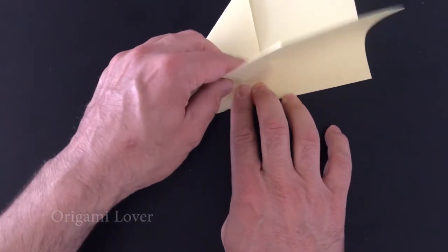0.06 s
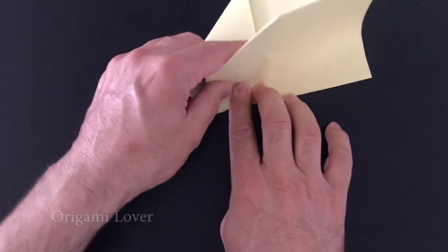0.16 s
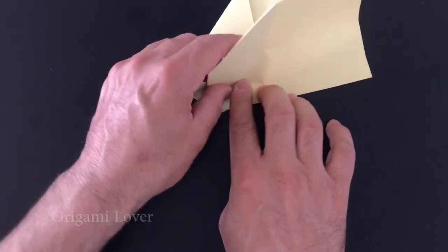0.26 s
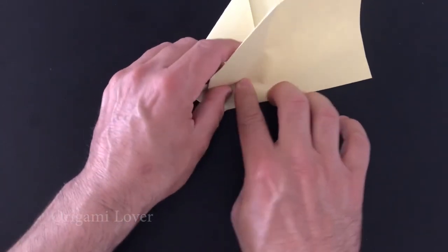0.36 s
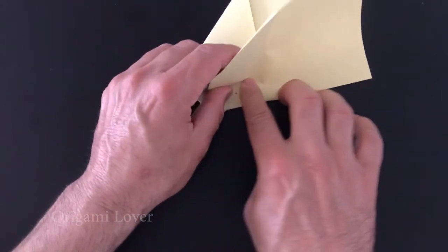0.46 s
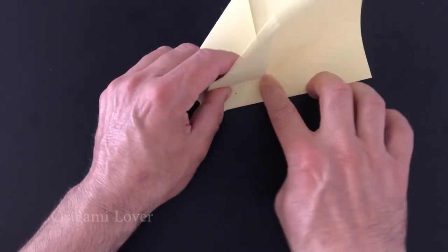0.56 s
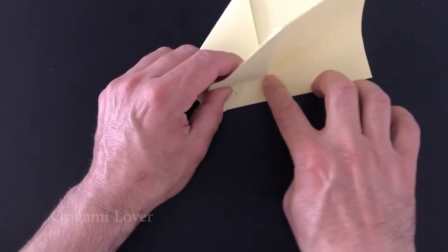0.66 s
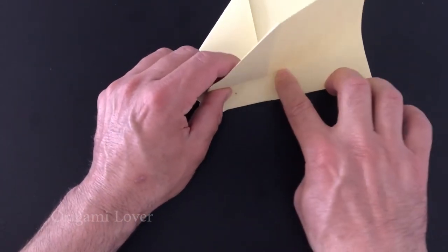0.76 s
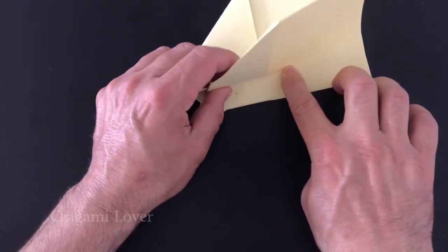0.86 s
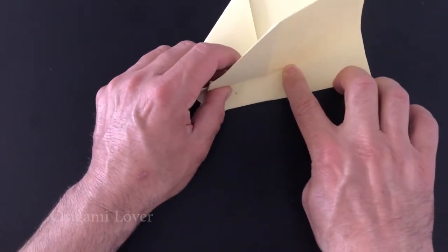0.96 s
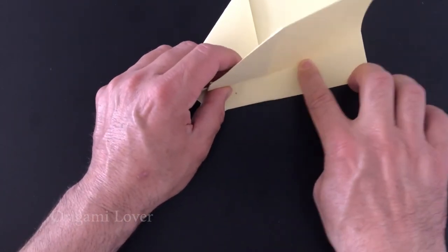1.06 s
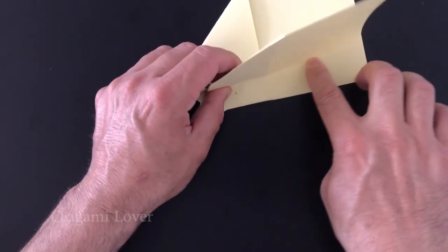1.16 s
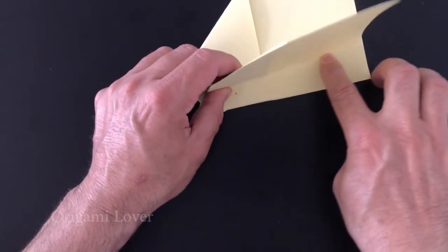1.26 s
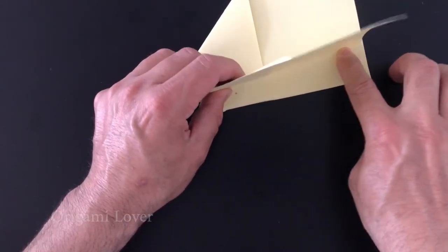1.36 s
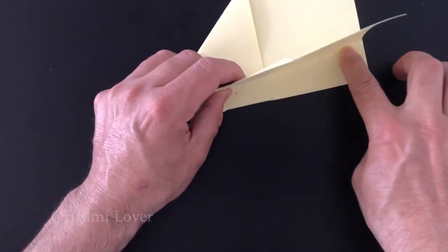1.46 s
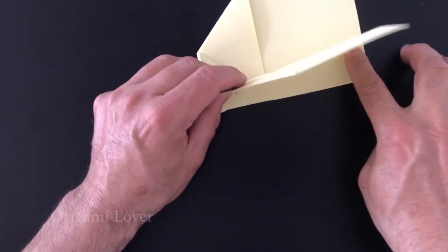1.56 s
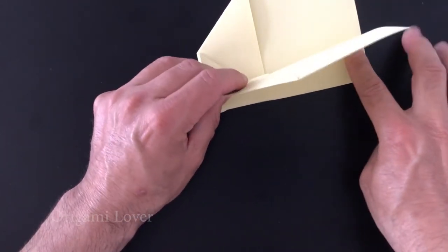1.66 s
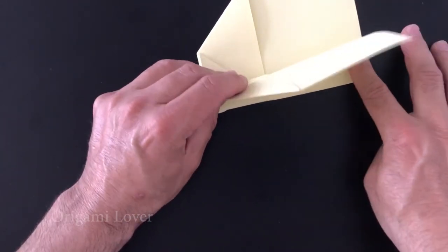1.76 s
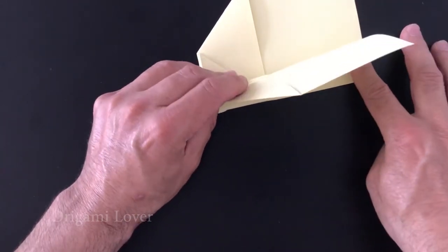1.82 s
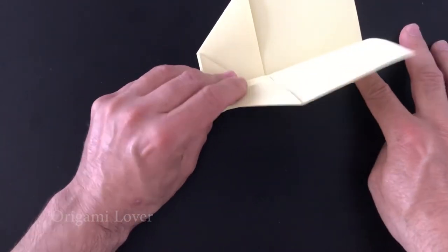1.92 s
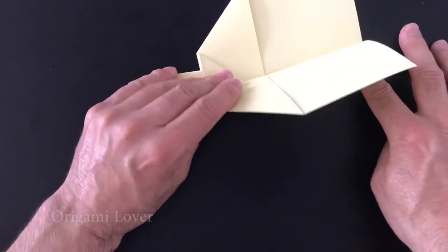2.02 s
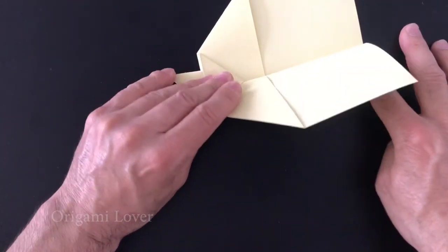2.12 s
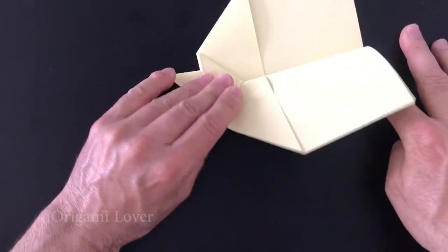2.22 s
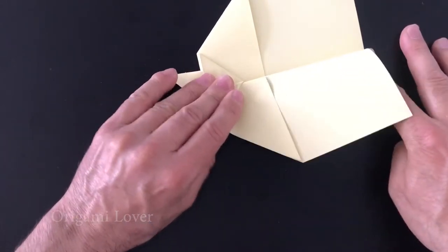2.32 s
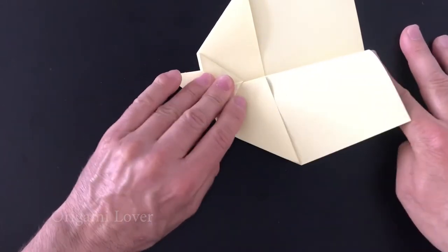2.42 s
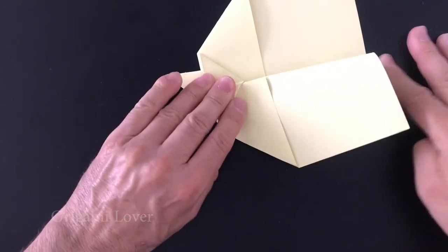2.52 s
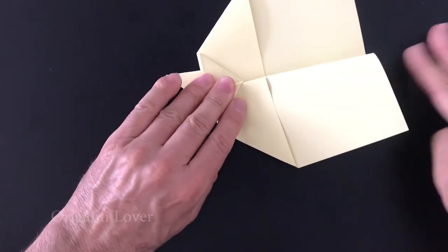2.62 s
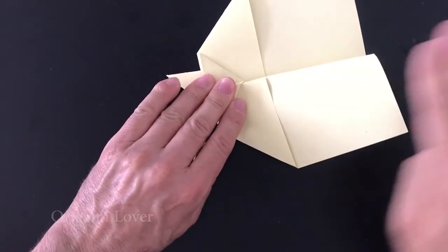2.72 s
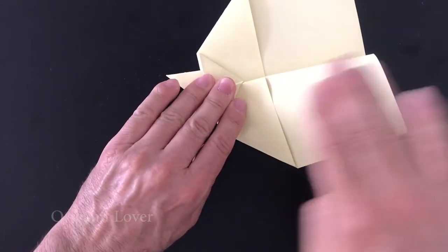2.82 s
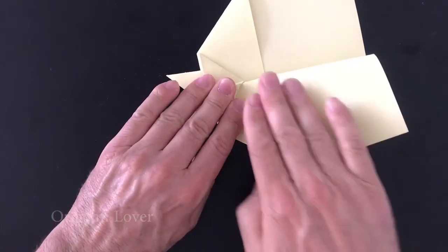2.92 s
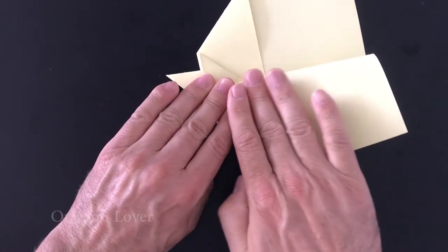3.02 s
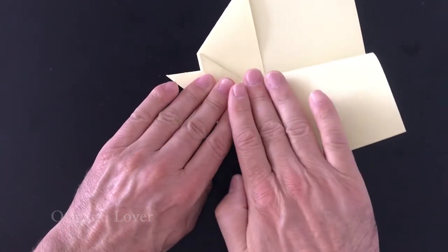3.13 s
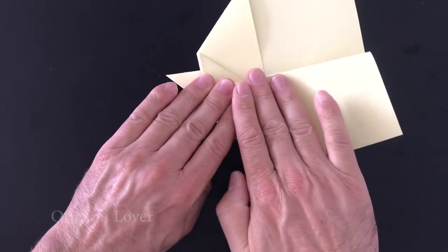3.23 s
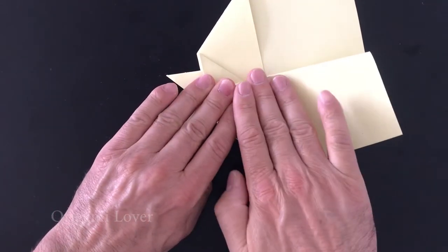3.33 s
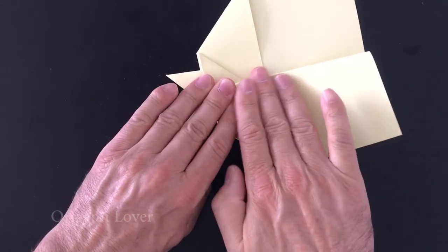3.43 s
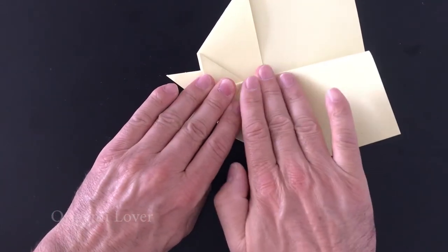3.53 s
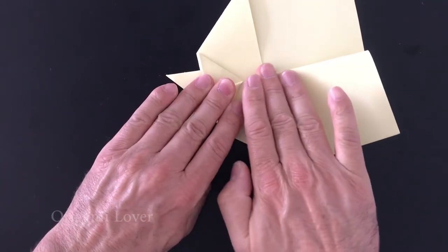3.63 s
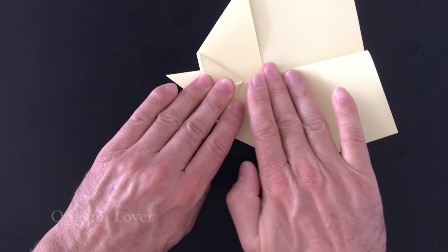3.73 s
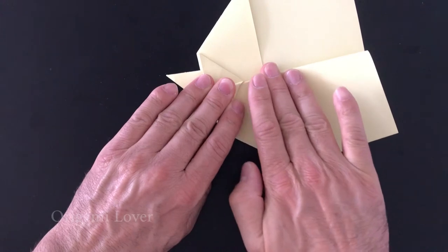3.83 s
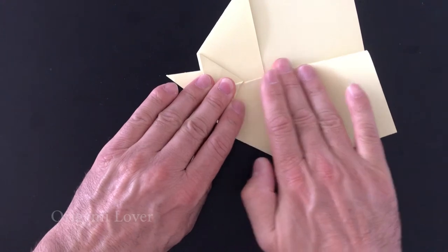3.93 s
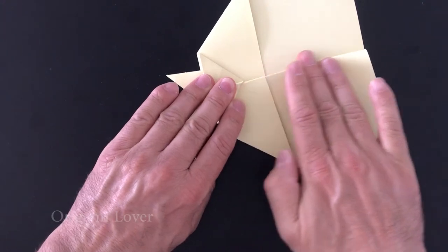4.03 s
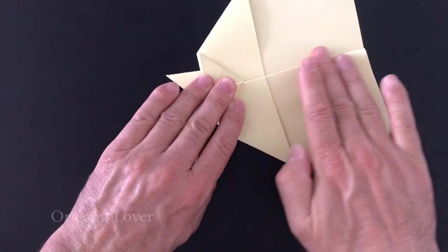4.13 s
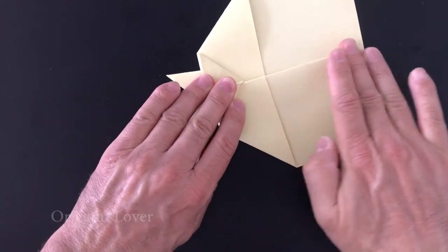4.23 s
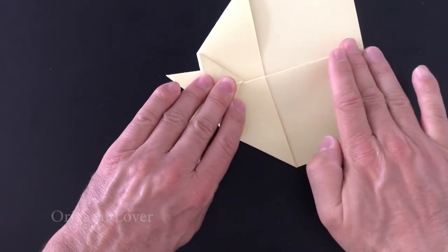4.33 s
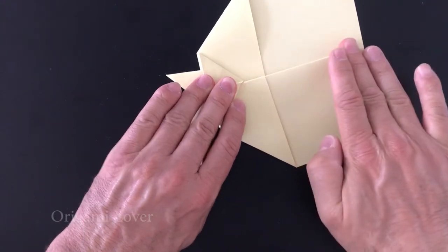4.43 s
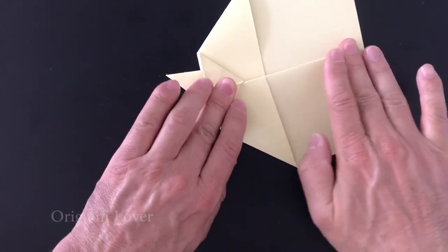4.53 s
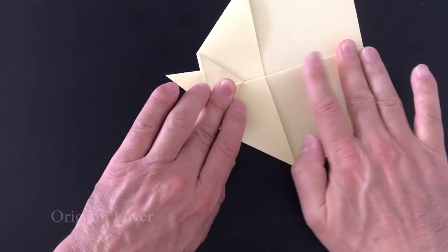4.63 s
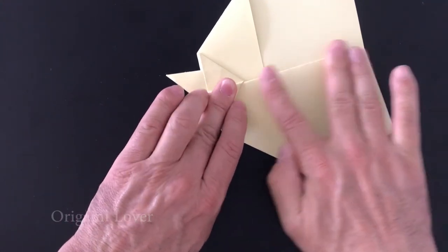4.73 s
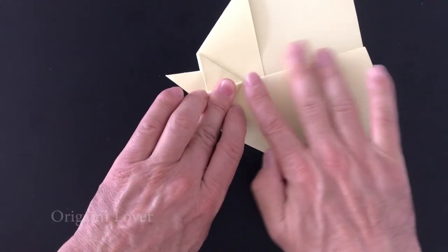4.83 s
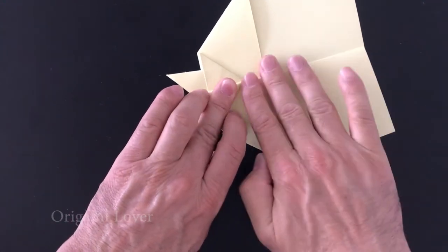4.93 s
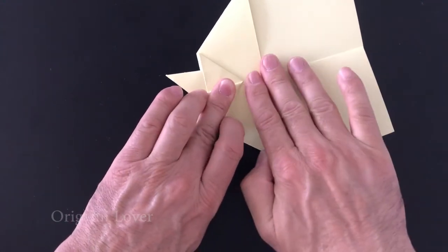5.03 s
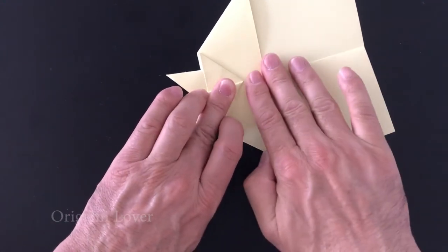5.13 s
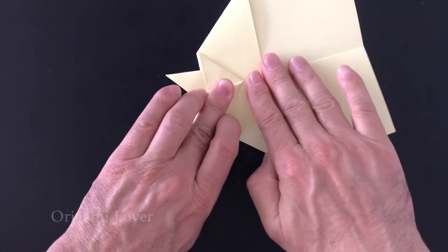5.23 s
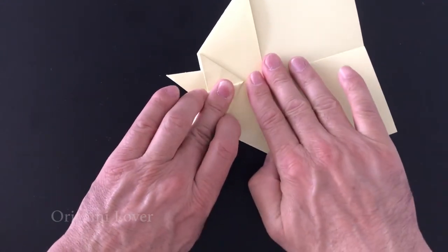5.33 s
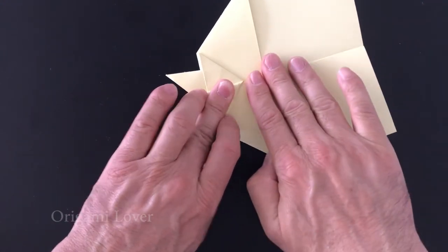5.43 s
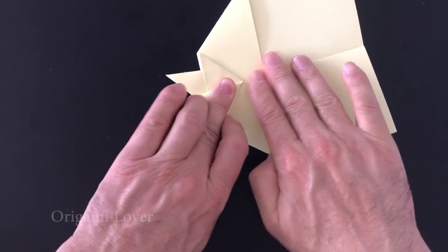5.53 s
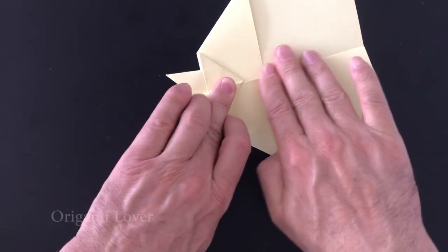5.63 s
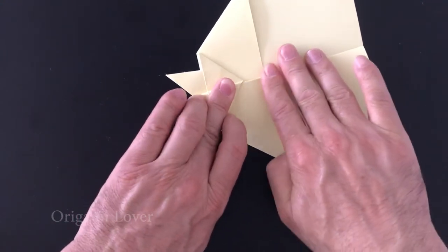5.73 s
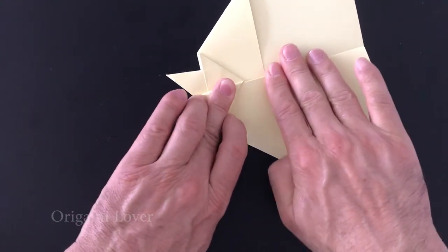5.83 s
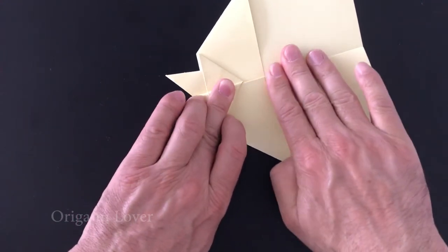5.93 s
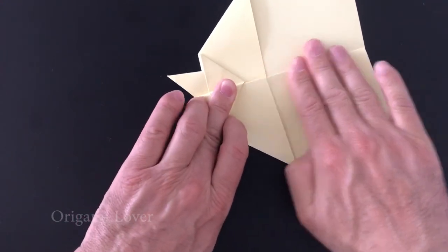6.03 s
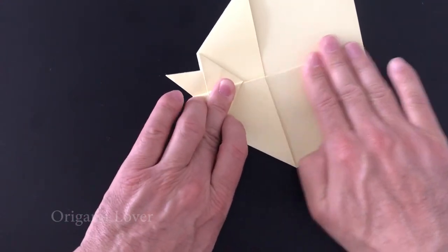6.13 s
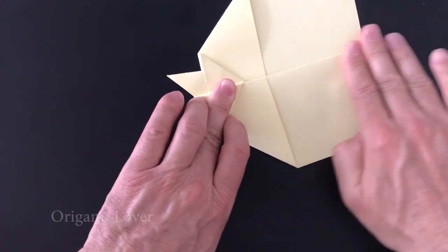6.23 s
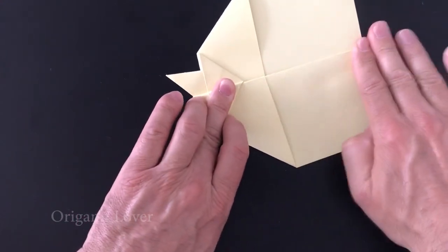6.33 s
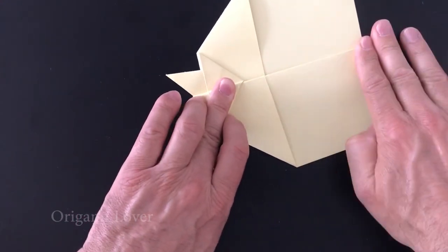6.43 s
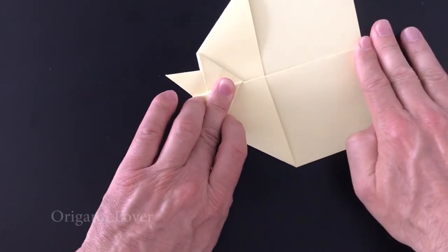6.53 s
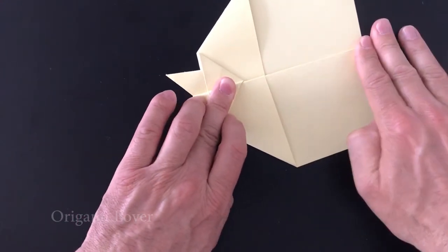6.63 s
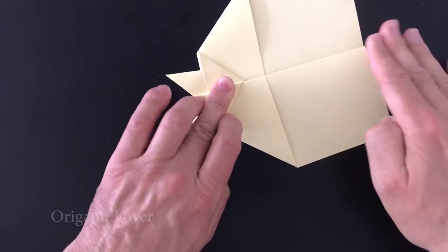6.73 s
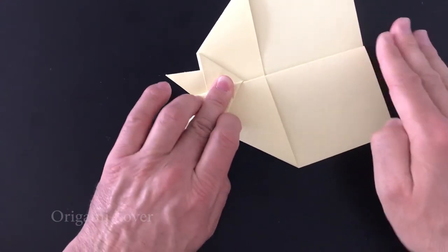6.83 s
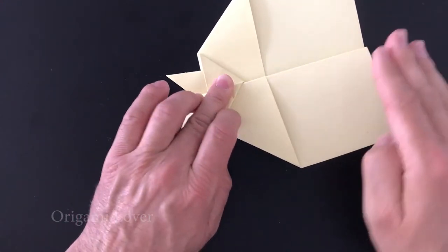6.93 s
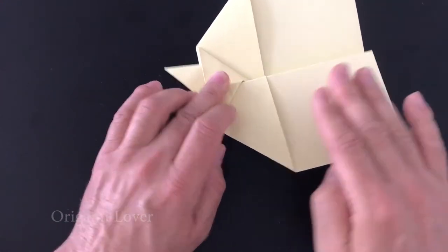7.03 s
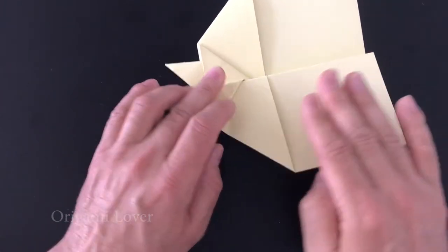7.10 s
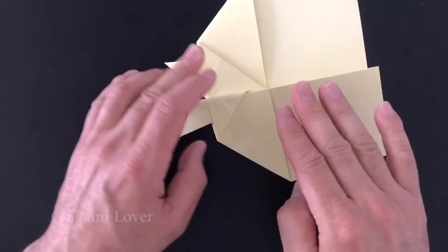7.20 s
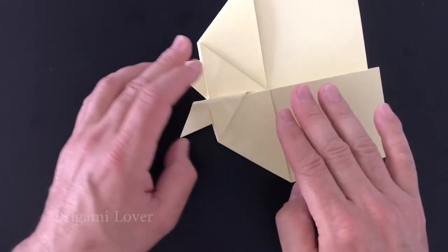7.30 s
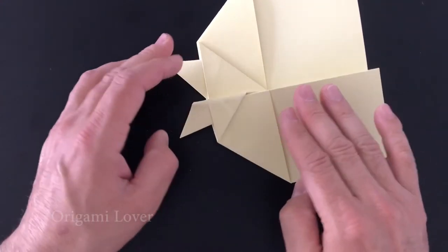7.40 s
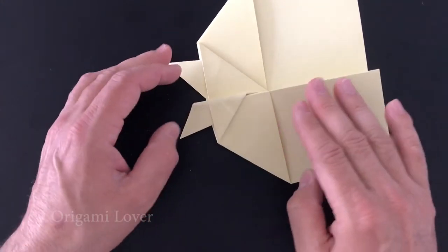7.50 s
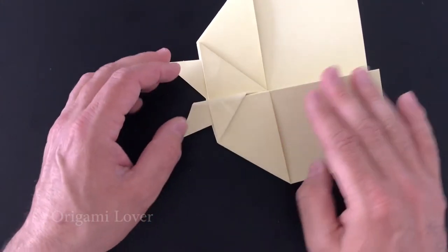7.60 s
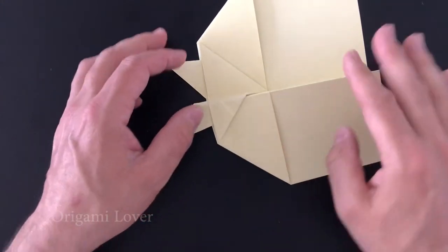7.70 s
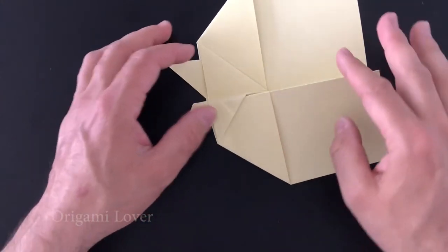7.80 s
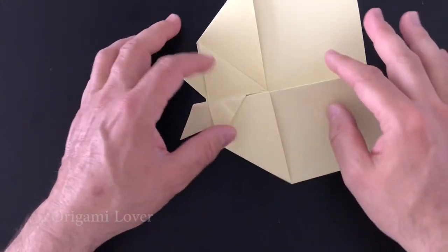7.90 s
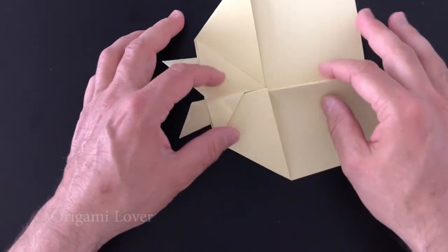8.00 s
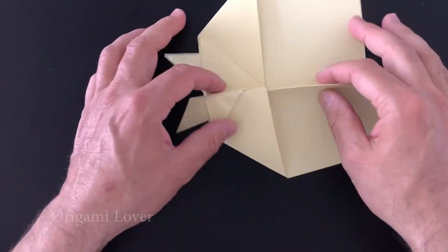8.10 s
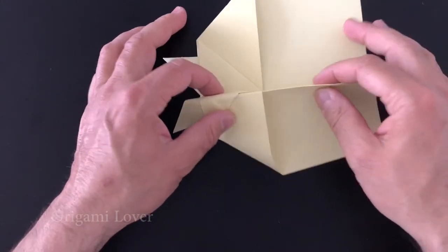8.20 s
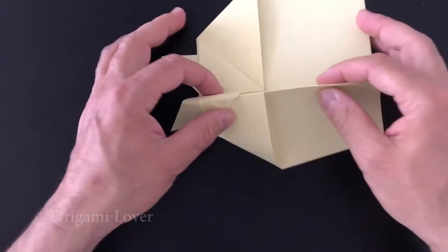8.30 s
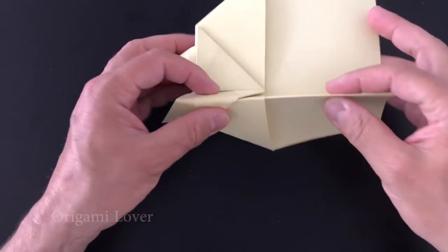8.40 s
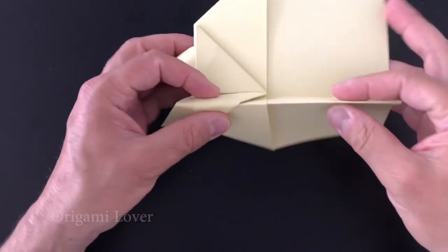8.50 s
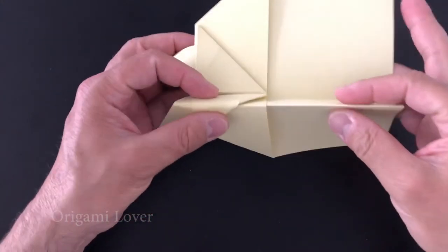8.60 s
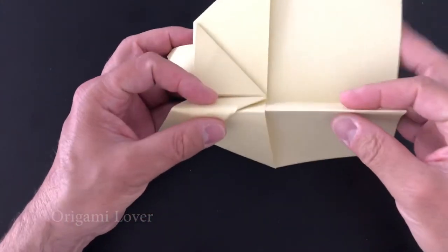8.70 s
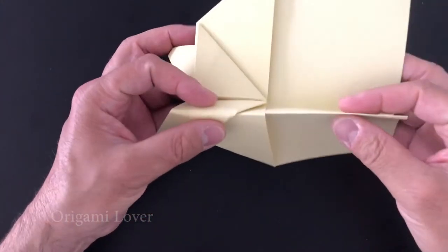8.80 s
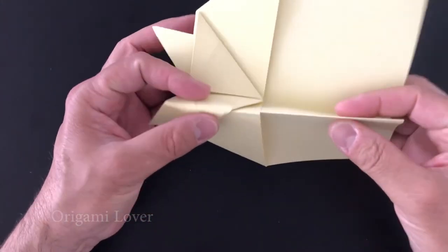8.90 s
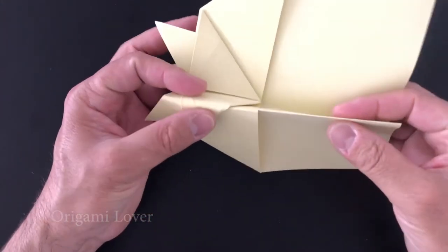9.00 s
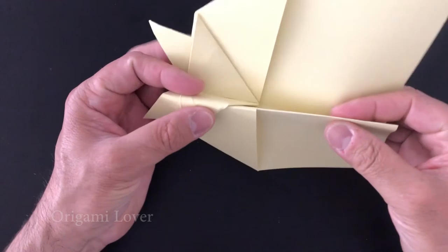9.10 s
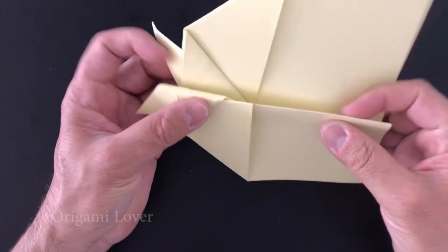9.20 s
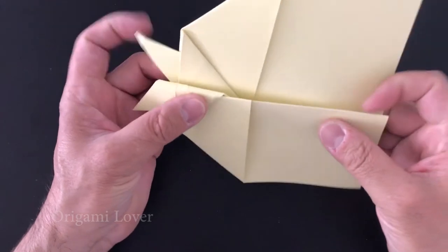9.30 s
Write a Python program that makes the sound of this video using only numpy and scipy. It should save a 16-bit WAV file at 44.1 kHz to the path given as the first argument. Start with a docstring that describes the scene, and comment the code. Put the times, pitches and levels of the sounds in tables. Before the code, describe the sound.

A stiff sheet of paper is folded on a table in a small, quiet room, heard close up. Rustling and short fingertip scrapes come first, with a few dull taps and sharp snaps. Flat hands then press and smooth the crease with broader rubs and soft thuds. After a calmer stretch the sheet swishes over the table and ends in bright crackles as it is lifted and bent.

```python
"""A small, quiet room: a sheet of paper is folded by hand on a table, over still air and a faint hum.
Fingertips hiss and scrape along the crease: many tiny fibre catches over smooth noise, shaped stroke by stroke.
A flat hand taps and smooths the sheet, which rustles as it bends and swishes as it is dragged.
The stiff paper buckles with sharp snaps: runs of pulses that ring in five registers, answered by the room."""
import sys
import numpy as np
from scipy import signal
from scipy.fft import rfft, irfft, next_fast_len
from scipy.io import wavfile

SR = 44100
rng = np.random.default_rng(int(sys.argv[2]) if len(sys.argv) > 2 else 0)


def unload_wav(signal):
    """Save mono or channel-first audio to the path in sys.argv[1] as 16-bit WAV at rate SR, clipped to [-1, 1]."""
    wavfile.write(
        sys.argv[1],
        SR,
        np.round(np.clip(np.atleast_2d(signal).T, -1, 1) * 32767).astype(np.int16),
    )


N = 412335
TIME = np.arange(N) / SR

# Levels in the tables and settings stand ahead of the trims that the functions apply.
# registers in which the sheet rings, in order thump, flap, crack, tick, fizz:
# [low f/Hz, high f/Hz, t60/s, shiver against the slip/dB, lingering share of the shiver/dB]
REGISTERS = [(134, 444, 0.065, -26.5, -8), (464, 1330, 0.022, -18.5, -11.5),
             (1410, 3470, 0.006, -17, -13.5), (3710, 7000, 0.0077, -23, -13.5),
             (7500, 15400, 0.0038, -3, -23.5)]
# broad resonances of the sheet on the table: [f/Hz, width/Hz, level/dB]
SHEET_RESONANCES = [(302, 54, 8.5), (740, 175, -4), (1018, 310, 8.5), (1380, 100, -5), (2320, 1860, 3)]
# fingertips slide and push paper over paper:
# [start t/s, length/s, skin level/dB, scrape level/dB, swell over the stroke/dB, skin above 10 kHz/dB]
STROKES = [(0.01, 0.095, -52, -48.5, -12, -4), (0.112, 0.056, -65, -62, -2, -5),
           (0.162, 0.086, -62.5, -59, -9, 0), (0.259, 0.21, -56.5, -62, -7, -5.5),
           (0.445, 0.18, -51.5, -57, 11, -1.5), (0.667, 0.19, -54.5, -62, -3.5, 3),
           (0.928, 0.024, -59.5, -65, 0, 3), (1.01, 0.16, -55, -64, -2, -0.5),
           (1.163, .25, -58.5, -67.5, -2.5, 4.5), (1.417, .11, -71, -74, -1, 3),
           (1.56, 0.12, -63.5, -67, -1, 6), (1.703, 0.099, -77, -72, 5, 0),
           (1.93, 0.44, -65.5, -65, -1, -3), (2.406, 0.16, -64.5, -57.5, 14.5, 2),
           (2.585, 0.085, -61, -78, 8, -3), (2.982, 0.05, -62, -60.5, -7, 0),
           (3.093, 0.023, -64.5, -69, 0, -2), (3.203, 0.22, -75.5, -64.5, -10, -5),
           (3.455, 0.036, -53.5, -53.5, 0, 1), (3.61, 0.041, -60, -55.5, -3, -1),
           (3.759, 0.027, -63, -55, 1, 1), (3.895, 0.11, -54.5, -54.5, -10, 0),
           (4.0, .3, -52, -60.5, -4.5, -2.5), (4.755, 0.096, -60, -68.5, 6, 2),
           (4.874, 0.044, -58.5, -62, 4, 3.5), (5.514, 0.068, -68.5, -73, -3, 1),
           (5.599, 0.082, -56.5, -58.5, -5, 0.5), (5.726, 0.018, -63, -71, 5, -5),
           (6.005, 0.31, -56.5, -63.5, -0.5, 3.5), (6.283, .11, -64, -68, 0, 1),
           (6.685, .14, -73, -84, 3, -3), (6.88, .15, -77, -77, 2, 0), (7.027, 0.1, -60, -65.5, 11.5, -2.5),
           (7.964, 0.088, -57, -64, 1, -1), (8.064, 0.18, -54, -78, -8, -0.5),
           (8.252, 0.26, -59, -62.5, -2.5, 1.5), (8.528, 0.23, -63.5, -71, -7, 2),
           (8.84, 0.13, -56, -63, 3, 0.5), (9.043, 0.36, -57.5, -59.5, -2, -0.5)]

# linear attack time and exponential release time constant of the movements
STROKE_ATTACK_S, STROKE_RELEASE_S = 0.014, 0.014
BEND_ATTACK_S, BEND_RELEASE_S = 0.015, 0.025
DRAG_ATTACK_S, DRAG_RELEASE_S = 0.014, 0.0089
# a hand moves fastest halfway: how far the ends fall below the middle, per second of stroke
ARCH_DB_PER_S = 7


def from_db(db):
    """Decibels to gain."""
    return 10 ** (np.asarray(db) / 20)


def rms_one(x):
    """Scale to rms 1."""
    return x / np.sqrt(np.mean(x ** 2) + 1e-20)


def level(rows):
    """A level curve as a gain per sample, inaudible outside its span."""
    rows = np.array(rows)
    return from_db(np.interp(TIME, rows[:, 0], rows[:, 1], left=-140, right=-140))


def at_hz(points, hz):
    """Read a spectrum on a log-frequency axis."""
    points = np.array(points)
    return np.interp(np.log(np.maximum(hz, 1)), np.log(points[:, 0]), points[:, 1])


def band(x, low, high, order=2):
    """Causal band-pass."""
    edges = [low, min(high, SR / 2 - 1000)]
    return signal.sosfilt(signal.butter(order, edges, "band", fs=SR, output="sos"), x)


def resonance(x, hz, width_hz):
    """One resonance with gain 1 on top."""
    r = np.exp(-np.pi * width_hz / SR)
    zeros = np.array([1, 0, -1]) * (1 - r * r) / 2
    poles = [1, -2 * r * np.cos(2 * np.pi * hz / SR), r * r]
    return signal.lfilter(zeros, poles, x)


def coloured(x, colour):
    """Give a steady sound a spectrum; rms 1."""
    size = next_fast_len(N)
    gain = from_db(at_hz(colour, np.fft.rfftfreq(size, 1 / SR)))
    return rms_one(irfft(rfft(x, size) * gain, size)[:N])


def drift(rate):
    """Random wandering that heads for a new value `rate` times a second; rms 1."""
    steps = rng.standard_normal(8192)
    return rms_one(np.interp(TIME * rate, np.arange(len(steps)), steps))


def add(out, s, sound):
    """Mix a sound in at its moment."""
    start = max(round(s * SR), 0)
    out[start:start + len(sound)] += sound


def gesture(start, length, swell_db, attack_s, release_s):
    """Gain of one movement: it gets going, arches over its middle while it swells or fades, and dies away."""
    t = TIME - start
    gain = np.zeros(N)
    on = (t > 0) & (t < length + 8 * release_s)
    t = t[on]
    from_middle = np.minimum(t / length, 1) - 0.5
    db = swell_db * from_middle - ARCH_DB_PER_S * length * (2 * from_middle) ** 2
    release = np.exp(-np.maximum(t - length, 0) / release_s)
    gain[on] = np.minimum(t / attack_s, 1) * from_db(db) * release
    return gain


def gestures(rows, attack_s, release_s):
    """Joint gain of movements [start t/s, length/s, level/dB, swell/dB], summed in power."""
    power = sum((from_db(db) * gesture(s, length, swell, attack_s, release_s)) ** 2
                for s, length, db, swell in rows)
    return np.sqrt(power)


def friction(catches_per_s, spread_db, smooth, judder_db, judder_rate):
    """Fibres catch and let go: tiny clicks of uneven size over a smooth hiss, with a juddering contact."""
    sizes = from_db(spread_db * np.minimum(rng.exponential(1, N), 4)) * rng.choice([-1, 1], N)
    catches = rms_one(sizes * (rng.random(N) < catches_per_s / SR))
    judder = from_db(judder_db * drift(judder_rate))
    return (catches + smooth * rng.standard_normal(N)) * judder


def background():
    """Still air as coloured noise, a slightly wavering hum and a faint tone that comes and goes."""
    # spectrum of the still air: [f/Hz, level/dB]
    air_colour = [(15, -47.5), (25, -20.5), (70, -4), (102, 0), (170, -7.5), (301, -11), (575, -23.5),
                  (818, -20), (1290, -24), (1440, -25.5), (3820, -31), (4370, -28.5), (5000, -33),
                  (14800, -37.5), (16000, -47.5)]
    # low hum: [f/Hz, rms level/dB]
    hum_partials = [(49, -70), (98, -69.5)]
    # faint tone in the room: [t/s, level/dB]
    tone_level = [(2.5, -80), (2.7, -79), (3.15, -71.5), (3.5, -89), (4.9, -78.5), (5.3, -91)]
    hum = sum(from_db(db) * rms_one(np.sin(2 * np.pi * hz * TIME + 0.4 * drift(6.8)))
              for hz, db in hum_partials)
    tone = level(tone_level) * rms_one(np.sin(2 * np.pi * 495 * TIME + 0.56 * drift(4.6)))
    air = from_db(-64.5) * coloured(rng.standard_normal(N), air_colour)
    return hum + tone + air


def room(x):
    """Diffuse reflections build up after a few milliseconds; each band of noise dies away at its own rate."""
    # decay of the room: [f/Hz, t60/s]
    room_t60 = [(150, 0.1), (1000, 0.41), (2000, 0.55), (4000, 0.42), (7000, 0.24), (15000, 0.4)]
    # reverberation against the direct sound: [f/Hz, level/dB]
    room_level = [(150, -8), (700, -10.5), (1600, -7), (3000, -15), (6000, -10.5), (15000, -20)]
    t = TIME[:SR * 3 // 5]
    edges = np.geomspace(80, 18000, 24)
    build_up = np.clip((t - 0.003) / 0.0031, 0, 1)
    response = np.zeros(len(t))
    for low, high in zip(edges, edges[1:]):
        hz = np.sqrt(low * high)
        decay = from_db(-60 * t / max(at_hz(room_t60, hz), 0.02))
        tail = band(rng.standard_normal(len(t)) * build_up * decay, low, high)
        # each band gets its share of energy by width
        share = np.sqrt(2 * (high - low) / SR)
        response += from_db(at_hz(room_level, hz)) * tail / np.linalg.norm(tail) * share
    return signal.fftconvolve(x, response)[:N]


def thuds():
    """The weight of the soft hand pushes the table top, whose modes answer with a short, low knock."""
    # the hand lands on the table: [t/s, level/dB]
    landings = [(3.64, -49), (3.779, -53), (5.608, -50), (6.032, -43.5), (8.76, -48), (9.243, -49.5)]
    # modes of the table top, detuned at random for each thud: [f/Hz, relative level/dB, t60/s]
    table_modes = [(105, -21, 0.083), (136, 4, 0.11), (188, 5.5, 0.047)]
    out = np.zeros(N + SR)
    t = TIME[:SR // 4]
    push = 1 - np.exp(-t / 0.0011)
    for s, db in landings:
        detune = 1 + 0.036 * rng.standard_normal(len(table_modes))
        modes = sum(from_db(mode_db - 60 * t / t60) * np.sin(2 * np.pi * hz * d * t)
                    for (hz, mode_db, t60), d in zip(table_modes, detune))
        add(out, s, from_db(db) * push * modes)
    return out[:N]


def bending():
    """How strongly the flap rustles and the sheet flexes; stiff paper yields unevenly."""
    # the sheet is bent or pressed flat:
    # [start t/s, length/s, rustle level/dB, low flexing level/dB, swell/dB]
    bends = [(0.0, 0.17, -58, -62, -7), (0.257, 0.093, -61, -59.5, -8), (0.432, 0.19, -58, -57.5, 15),
             (0.618, 0.26, -56.5, -57.5, -7), (0.996, 0.29, -63.5, -60.5, -1), (1.25, .17, -56.5, -52, 0),
             (1.438, 0.19, -57.5, -53, 7.5), (1.731, .11, -59.5, -57, -3), (1.889, 0.18, -57.5, -55.5, -18),
             (2.084, 0.37, -64, -55, 5.5), (2.462, 0.1, -61, -67, 16), (2.58, 0.082, -75, -69, -7),
             (3.055, 0.34, -70, -74, 0), (3.445, 0.065, -63.5, -63, 0), (3.613, 0.33, -71, -67.5, -11),
             (3.905, 0.43, -79, -64.5, -5), (4.513, 0.45, -77, -70.5, 0), (5.61, 0.16, -60.5, -60, -17),
             (5.86, 0.11, -65, -68, -3), (6.017, 0.41, -66, -62.5, -7), (6.45, 0.65, -73.5, -69.5, -5),
             (7.947, 0.38, -69.5, -73.5, -5), (8.257, 0.76, -67, -76, 1), (8.76, 0.25, -61, -67, -9),
             (9.057, 0.21, -63, -68, -13)]
    uneven = from_db(2 * drift(22))
    rustle_rows = [(s, length, db, swell) for s, length, db, _, swell in bends]
    flex_rows = [(s, length, db, swell) for s, length, _, db, swell in bends]
    rustling = gestures(rustle_rows, BEND_ATTACK_S, BEND_RELEASE_S)
    flexing = gestures(flex_rows, BEND_ATTACK_S, BEND_RELEASE_S)
    return uneven * rustling, uneven * flexing


def crinkles(per_s, spread_db):
    """Stray little ticks that ring in the sheet; rms 1."""
    sizes = from_db(spread_db * np.minimum(rng.exponential(1, N), 3)) * (rng.random(N) < per_s / SR)
    # the tiny offset keeps the resonators numerically awake
    ticks = sizes + sum(from_db(db) * resonance(sizes + 1e-18, hz, width)
                        for hz, width, db in SHEET_RESONANCES)
    return rms_one(band(ticks, 400, 3500, order=1))


def sheet():
    """Rustle, low flutter and stray crinkles: coloured friction and ticks that follow the bending."""
    # spectra of the rustling flap and of the flexing sheet: [f/Hz, level/dB]
    rustle_colour = [(350, -5.5), (520, -4), (680, 1.5), (800, 2), (1030, 6), (1400, -1), (1900, -3.5),
                     (3000, -40)]
    flex_colour = [(80, -13.5), (140, -8), (210, -6), (300, 3), (410, -12), (600, -10.5), (1000, -36.5)]
    rustling, flexing = bending()
    rustle_rub = friction(500, spread_db=0.0, smooth=0.81, judder_db=1.1, judder_rate=41)
    flex_rub = friction(150, spread_db=4.5, smooth=1.32, judder_db=0.56, judder_rate=40)
    rustle = rustling * coloured(rustle_rub, rustle_colour)
    flex = flexing * coloured(flex_rub, flex_colour)
    ticks = np.sqrt(rustling * flexing) * crinkles(per_s=15, spread_db=2.0)
    return from_db(-3.0) * rustle + from_db(-2.73) * flex + from_db(-14) * ticks


def swish():
    """The sheet rubs over the table; the gap's broad resonance rises briefly, then sinks as the gap opens."""
    # resonance of the gap beneath the dragged sheet: [t/s, f/Hz]
    gap_centre = [(7.95, 2540), (8.12, 3050), (8.19, 2870), (8.25, 2790), (8.32, 2000), (8.4, 1660),
                  (8.53, 1340)]
    # the sheet is dragged over the table: [start t/s, length/s, level/dB, swell/dB]
    drags = [(7.98, .205, -54.5, 19.5), (8.2, 0.041, -57.5, -6), (8.245, 0.28, -52.5, -11.5)]
    centre = np.interp(TIME, *np.transpose(gap_centre))
    rub = friction(4000, spread_db=4.0, smooth=1.4, judder_db=1.2, judder_rate=61)
    # shift the moving centre to 0 Hz, low-pass there and shift back: a band that follows the resonance
    turn = np.exp(2j * np.pi * np.cumsum(centre) / SR)
    gap = np.real(turn * signal.sosfilt(signal.butter(2, 620, fs=SR, output="sos"), rub / turn))
    slide = rms_one(gap + 0.33 * band(rub, 1960, 4150))
    return from_db(-0.5) * gestures(drags, DRAG_ATTACK_S, DRAG_RELEASE_S) * slide


def palm():
    """The flat hand rubs the crease, coloured by the hollow beneath it; creeping skin whistles thinly."""
    # resonances of the hollow under the hand: [f/Hz, width/Hz, level/dB]
    hollow_resonances = [(640, 110, -10), (1000, 147, -1.5), (1225, 170, -4.5), (1770, 130, -6.5),
                         (4300, 470, -14.5)]
    # the flat hand smooths the crease: [start t/s, length/s, level/dB, swell/dB]
    palm_strokes = [(3.9, 0.44, -55, -5), (6.01, .385, -53.5, -2), (6.4, .36, -67.5, -1)]
    # the creeping skin whistles: [start t/s, length/s, level/dB, swell/dB]
    whistles = [(6.36, 0.35, -83, 5)]
    rub = friction(3000, spread_db=6.0, smooth=0.94, judder_db=2.0, judder_rate=73)
    # neighbouring resonances alternate in sign
    hollow = sum((-1) ** k * from_db(db) * resonance(rub, hz, width)
                 for k, (hz, width, db) in enumerate(hollow_resonances))
    whistle = rms_one(band(rub, 4400, 4450))
    pressing = gestures(palm_strokes, DRAG_ATTACK_S, DRAG_RELEASE_S)
    creeping = gestures(whistles, DRAG_ATTACK_S, DRAG_RELEASE_S)
    return from_db(-2.5) * pressing * rms_one(band(hollow, 530, 4500)) + creeping * whistle


def scrape():
    """Coarse scrape of paper on paper under each stroke: sparser, more uneven catches than the skin's."""
    # spectrum of the scrape: [f/Hz, level/dB]
    scrape_colour = [(1300, -6.5), (2100, 0.5), (2900, 3.5), (4200, -0.5), (5500, -24.5), (9000, -17)]
    rub = friction(1800, spread_db=3.5, smooth=1.7, judder_db=1.5, judder_rate=79)
    rows = [(s, length, db, swell) for s, length, _, db, swell, _ in STROKES]
    push = gestures(rows, STROKE_ATTACK_S, STROKE_RELEASE_S)
    return from_db(-1.5) * push * coloured(rub, scrape_colour)


def skin():
    """Fine hiss of fingertips from dense catches; each stroke has its own share of treble."""
    # spectrum of the skin's hiss: [f/Hz, level/dB]
    skin_colour = [(2500, -8), (4200, -0.5), (5500, 4.5), (7500, 2), (9000, 4), (10500, -2.5), (12500, 1.5),
                   (16000, -4.5)]
    rub = friction(7000, spread_db=1.5, smooth=1.6, judder_db=1.4, judder_rate=98)
    hiss = coloured(rub, skin_colour)
    top = signal.sosfiltfilt(signal.butter(3, 10000, "high", fs=SR, output="sos"), hiss)
    body_rows = [(s, length, db, swell) for s, length, db, _, swell, _ in STROKES]
    top_rows = [(s, length, db + top_db, swell) for s, length, db, _, swell, top_db in STROKES]
    body_gain = gestures(body_rows, STROKE_ATTACK_S, STROKE_RELEASE_S)
    top_gain = gestures(top_rows, STROKE_ATTACK_S, STROKE_RELEASE_S)
    return from_db(-0.07) * (body_gain * (hiss - top) + top_gain * top)


def snap(length, levels_db, slip_share, loose_t60):
    """A fold gives way in a quick run of slips; each is a sharp pulse and leaves dense modes shivering."""
    t = TIME[:SR // 8]
    slipping = (rng.random(len(t)) < 2200 / SR) * (t < length)
    slips = slip_share * rng.standard_normal(len(t)) * slipping
    slips[0] = 1
    out = np.zeros(len(t))
    for (low, high, t60, shiver_db, loose_db), db in zip(REGISTERS, levels_db):
        # the free part of the sheet shivers on after the fold has stopped
        decay = from_db(-60 * t / t60) + from_db(loose_db) * from_db(-60 * t / loose_t60)
        vigour = np.sqrt(np.abs(signal.fftconvolve(slips ** 2, decay ** 2)[:len(t)]))
        shake = slips + from_db(shiver_db) * vigour * rng.choice([-1, 1], len(t))
        shake = shake + sum(from_db(gain_db) * resonance(shake, hz, width)
                            for hz, width, gain_db in SHEET_RESONANCES)
        ring = band(shake, low, high, order=3)
        # level as if the register's energy were spread over 10 ms
        out += from_db(db) * ring / np.sqrt(np.sum(ring ** 2) / (0.01 * SR))
    return out


def taps():
    """A tap thumps the sheet and slaps it on the table; the touch of skin gives the treble."""
    # fingers tap the sheet, or it flops against the table:
    # [t/s, length/s, thump level/dB, flap level/dB, skin contact level/dB]
    tap_rows = [(0.946, .013, -47.5, -59, -62), (1.163, 0.00007, -43.5, -35.5, -51.5),
                (1.2496, 0.0013, -41, -47.5, -67), (1.58, 0.02, -63, -38.5, -69),
                (1.5948, 0.014, -55, -39, -56.5), (1.815, .006, -62, -58, -65),
                (1.892, .009, -47.5, -52.5, -62), (2.09, 0.004, -51.5, -62, -77),
                (3.6397, 0.0041, -45.5, -51.5, -53.5), (3.7733, 0.0087, -46, -49, -52.5),
                (3.908, 0.0061, -46, -44.5, -51.5), (4.62, .0005, -56.5, -64, -73.5),
                (5.04, .01, -61.5, -64, -63.5), (5.571, 0.012, -56, -61, -64),
                (5.6032, .01, -40.5, -41, -52), (5.839, 0.0095, -45, -39.5, -49),
                (5.8817, .006, -44.5, -39, -50), (6.013, 0.0065, -49.5, -40, -49.5),
                (6.027, 0.024, -60, -56, -60.5), (6.98, 0.015, -65, -60.5, -73),
                (8.049, 0.0073, -70, -68, -57), (8.612, 0.014, -63, -62, -56.5)]
    # how the skin contact spreads over crack, tick and fizz: [level/dB] each
    contact_colour = [-2.5, -2, -5]
    out = np.zeros(N + SR)
    for s, length, thump_db, flap_db, contact_db in tap_rows:
        levels_db = [thump_db, flap_db, *(contact_db + np.array(contact_colour))]
        add(out, s, snap(length, levels_db, slip_share=0.55, loose_t60=0.088))
    return from_db(0.98) * out[:N]


def snaps():
    """Buckling snaps share one colour, tilted about the crack register and more or less focused on it."""
    # the stiff sheet buckles:
    # [t/s, length/s, crack level over 10 ms/dB, tilt/dB per octave, focus on the crack/dB per octave]
    buckles = [(0.014, 0.0012, -35, 2.5, -2.5), (0.6127, 0.002, -28.5, 0.6, -0.5),
               (2.981, 0.0083, -55.5, 0, 1.5), (3.1668, 0.0011, -33.5, 1, 3), (3.289, 0.0074, -31, -1.6, 3),
               (4.462, 0.0052, -77.5, 6, -2.5), (4.537, .008, -76, -3, -2), (4.82, .01, -63, -1, -4),
               (4.978, 0.0038, -64, 2, -3), (5.31, 0.0024, -55, -3.5, 0), (6.716, .006, -73, 3, -5),
               (7.2657, 0.0052, -55.5, 1.5, 5), (7.934, 0.0049, -58, 1.5, 2.5), (8.73, 0.011, -52.5, -4, 2),
               (8.7477, 0.015, -30, -0.4, .5), (8.7571, .0096, -29.5, -1.5, -0.5),
               (9.141, 0.0057, -41.5, -5.5, 2), (9.2244, 0, -24.5, 4.5, 0.5),
               (9.2394, .0003, -38.5, 5, -3.5), (9.295, 0, -38, -2.5, 0.3),
               (9.3241, 0.00028, -39, -1.8, -2.5)]
    # what all snaps share, from thump to fizz: [level against the crack/dB] each
    snap_colour = [-21.5, -3, 0, -5, -16.5]
    out = np.zeros(N + SR)
    octaves = np.log2([np.sqrt(low * high) for low, high, *_ in REGISTERS])
    above = octaves - octaves[2]
    for s, length, db, tilt, focus in buckles:
        levels_db = db + np.array(snap_colour) + tilt * above - focus * np.abs(above)
        add(out, s, snap(length, levels_db, slip_share=0.45, loose_t60=0.065))
    return from_db(0.77) * out[:N]


def scene():
    """Paper and hands, direct and as the room answers them, over the background."""
    blows = snaps() + taps() + thuds()
    # the pressure of the fingers wavers
    pressure = from_db(0.64 * drift(28))
    strokes = pressure * (skin() + scrape() + palm() + swish())
    rubs = from_db(0.58) * (strokes + sheet())
    # the rubs feed the room slightly harder than the blows do
    answer = room(blows + from_db(0.5) * rubs)
    return (blows + rubs + answer + background())[None]


def record(dry):
    """The top is cut steeply above 16.1 kHz."""
    return signal.sosfilt(signal.ellip(10, 0.1, 80, 16100, fs=SR, output="sos"), dry)


dry = scene()
out = record(dry)
unload_wav(out)
```